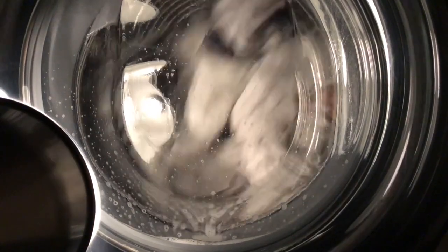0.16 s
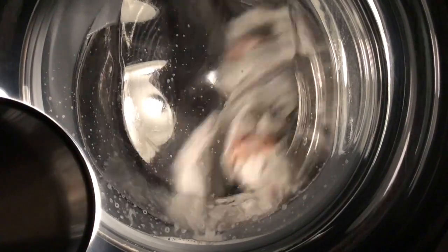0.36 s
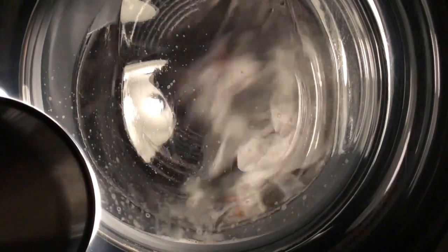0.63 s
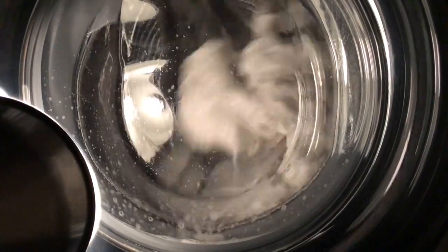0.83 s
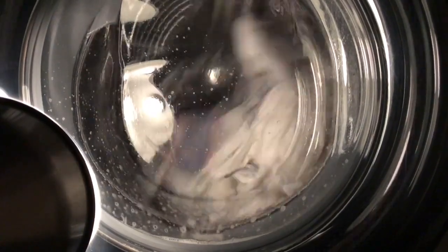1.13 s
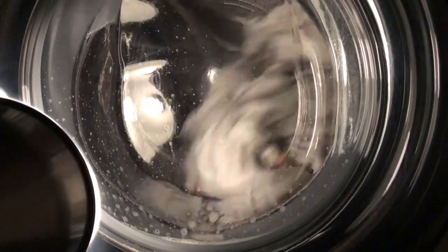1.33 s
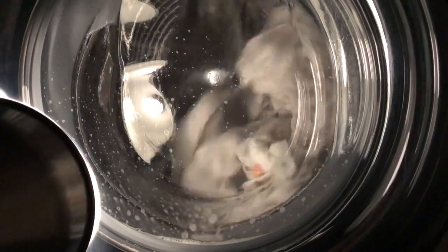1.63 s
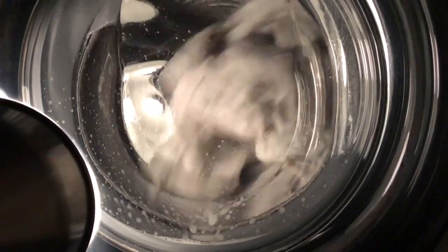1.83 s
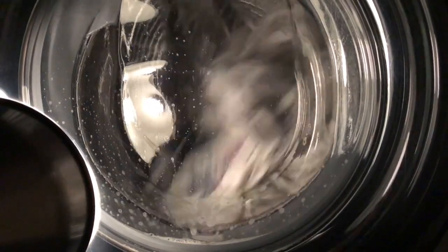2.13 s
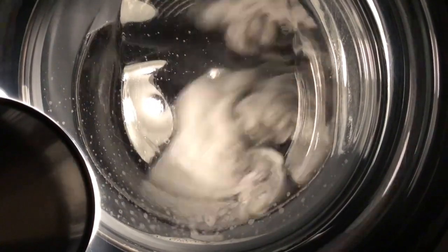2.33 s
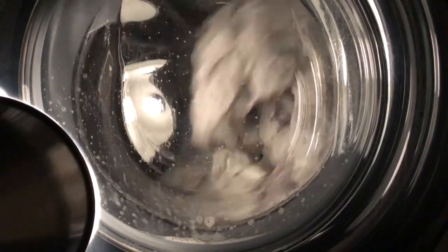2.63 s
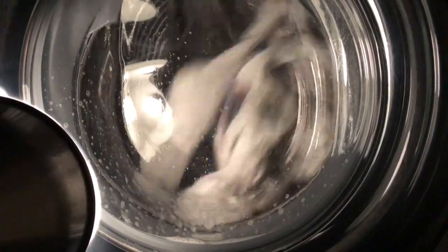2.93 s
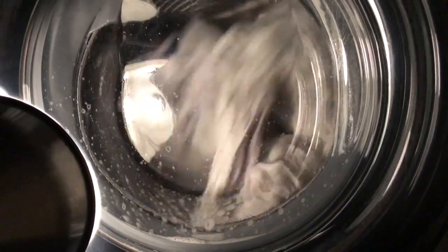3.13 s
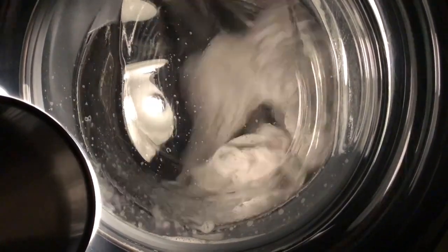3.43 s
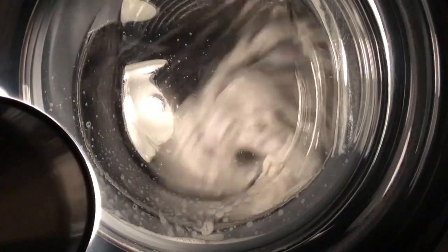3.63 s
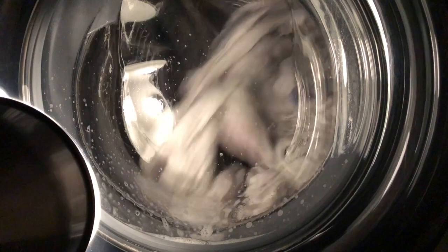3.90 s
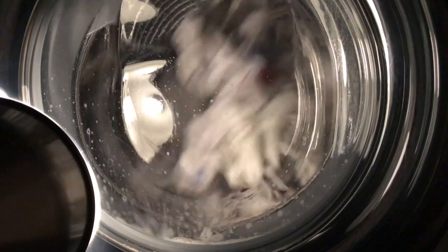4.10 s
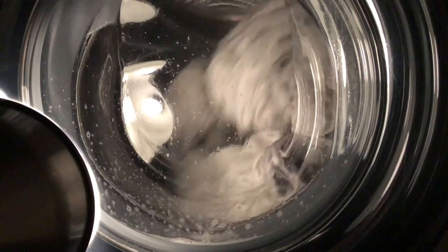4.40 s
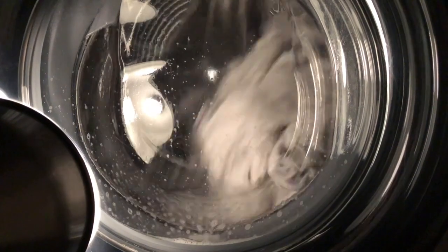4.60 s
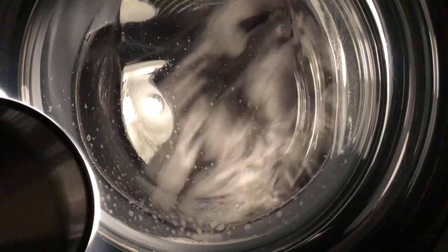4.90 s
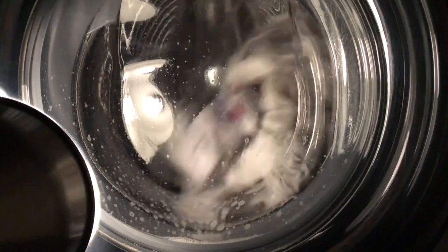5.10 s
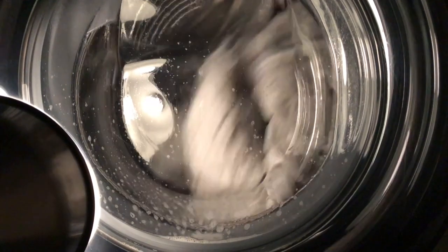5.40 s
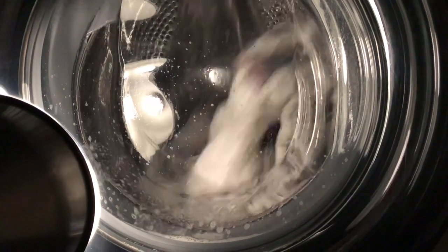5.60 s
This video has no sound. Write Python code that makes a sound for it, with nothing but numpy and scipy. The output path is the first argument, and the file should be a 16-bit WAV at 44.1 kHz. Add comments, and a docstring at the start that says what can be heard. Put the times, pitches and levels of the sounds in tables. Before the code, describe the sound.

A wet load tumbles in a front-loading washing machine at home, heard in mono very close to the door, with slight small-room echo. From the first moment, suds churn low and soft, with gurgles, tiny drips and light fizz. Soaked cloth falls irregularly, roughly ten impacts a second: short, damp slaps with dull drum knocks, deep tub thumps and splashes mostly muffled by the glass. A sharp, hollow slap stands out at 0.3 s; stirring dips near 0.75 s and swells near 1.2 s. A heavy slap lands at 1.94 s, then a strong cluster from 2.8 to 3.35 s, some with hollow, falling gulps of trapped air. From 3.5 to 5.4 s falls are generally softer and sloshier, with small flops between. Another firm slap comes at 5.53 s. Faint motor hum around a low pitch and very thin high whines run underneath until about 5.54 s, then quickly stop, leaving water and steady low room noise.

```python
"""Wet cloth slaps and thumps in a washing machine, heard close to the door in a small room.
Each fall is shaped noise for spray and splash, plus bubbles and decaying tones of the drum and tub.
Water sloshes, gurgles and drips: noise and short rising tones that follow the stirring.
The motor hums and its inverter whines until the drive switches off near the end.
A steady noise of machine and room lies underneath."""
import sys
import numpy as np
from scipy import signal
from scipy.fft import rfft, irfft, next_fast_len
from scipy.io import wavfile
from scipy.ndimage import map_coordinates

SR = 44100
rng = np.random.default_rng(int(sys.argv[2]) if len(sys.argv) > 2 else 0)


def transcribe(signal):
    """Save signal, clipped to [-1, 1], as a 16-bit WAV file at the path in sys.argv[1]."""
    frames = np.atleast_2d(signal).T
    limited = np.clip(frames, -1, 1)
    pcm = np.round(limited * 32767).astype(np.int16)
    wavfile.write(sys.argv[1], SR, pcm)


N = 253575  # length in samples

# Levels in the tables are starting points; the functions trim them further.
# Heavy falls of wet cloth. Each row: time in seconds, force in dB, tub thump in dB against the force,
# splash in dB against the force, basic fade time in seconds.
SLAPS = [(0.213, -36, -12, -23, 0.024), (0.282, -38, -13, -18.5, 0.016),
         (0.292, -29.5, -10.5, -22.5, 0.0086), (0.42, -37, -9, -19, 0.022),
         (0.439, -39.5, -5, -13.5, 0.012), (0.599, -37.5, -5, -22, 0.039), (0.639, -40.5, -8, -17.5, 0.027),
         (0.806, -39, -2.5, -23.5, 0.052), (0.865, -38.5, -3, -22, 0.022), (1.012, -35.5, -1.5, -16, 0.015),
         (1.175, -39, -6, -20, 0.0096), (1.253, -44.5, -6, -13, 0.017), (1.382, -40.5, -5, -19.0, 0.036),
         (1.494, -45.5, -3, -15, 0.019), (1.607, -44, -2.5, -16.5, 0.03), (1.709, -41, -12, -13.5, 0.0091),
         (1.937, -29, -5, -29, 0.027), (1.948, -39, -8, -12, 0.0089), (2.015, -41, -6, -22, 0.055),
         (2.078, -37.5, -3, -22.5, 0.028), (2.15, -40, -5, -20, 0.021), (2.303, -38.5, -6.5, -17.5, 0.025),
         (2.375, -51.5, -9, -11.5, 0.018), (2.458, -41, -11, -17.5, 0.026),
         (2.613, -38.5, -3.5, -22, 0.044), (2.703, -49.5, -3, -17, 0.016), (2.773, -37.5, -14, -33, 0.0051),
         (2.844, -32.5, -4, -23, 0.041), (2.898, -35.5, -7, -23.0, 0.037), (2.966, -32, -11, -22, 0.011),
         (3.008, -44.5, -2, -20, 0.048), (3.228, -30.5, -18, -23, 0.011), (3.276, -43.5, -6, -18, 0.026),
         (3.328, -33, -11, -24, 0.027), (3.404, -49, -8, -11, 0.014), (3.536, -45, -14, -16.5, 0.014),
         (3.637, -36, -9, -20.5, 0.023), (3.789, -39.5, -8.5, -17.5, 0.028), (3.88, -37, -3, -22, 0.014),
         (3.979, -38.5, -22, -22.5, 0.011), (4.066, -47.5, -7, -15, 0.016),
         (4.162, -36.5, -4.5, -21.5, 0.049), (4.218, -42.5, -6, -18, 0.018), (4.313, -48.5, -5, -15, 0.037),
         (4.383, -45.5, -13, -18, 0.017), (4.445, -41.5, -17, -21, 0.029), (4.525, -40.5, -9, -21, 0.055),
         (4.582, -40.5, -5, -19.0, 0.022), (4.647, -36.5, -3.5, -18.5, 0.051),
         (4.685, -43.5, -1, -21, 0.066), (4.83, -47.5, -8, -14, 0.037), (4.943, -45, 0.5, -18, 0.016),
         (5.058, -44.5, 1, -11, 0.023), (5.095, -37.5, -9, -18.5, 0.014),
         (5.252, -37.0, -13.5, -16.5, 0.012), (5.369, -41, -13, -21.0, 0.028),
         (5.526, -34, -6.5, -23.5, 0.026), (5.563, -43, -8, -14.5, 0.036)]
# Air trapped under a fold of cloth. Each row: start in seconds, level in dB, middle pitch in Hz.
GULPS = [(0.213, -41, 418), (0.296, -30.5, 493), (1.952, -40, 382), (2.974, -35.5, 535), (3.016, -45, 496),
         (3.231, -34.5, 389)]

# Tone colours, partly set by what the cabinet and the door glass let through.
# Each row: frequency in Hz, relative level in dB per Hz.
TUB = [(22, -65), (32, -30), (48, -17), (67, -7), (81, -12.5), (98, 1), (110, -1), (121, -2), (150, -3),
       (195, -7), (225, -12.5), (300, -43), (480, -100)]
DRUM = [(130, -46), (220, -10.5), (302, -2.5), (409, -7.5), (436, -12.5), (493, -11), (598, -16),
        (806, -16.5), (890, -37), (1160, -70), (1960, -120)]
SPLASH = [(520, -27.5), (890, 1), (1180, 4), (1380, -3), (1520, 0), (1650, -8.5), (2200, -9.5), (2470, -6),
          (2800, -15), (3640, -50.5), (6160, -120)]
SPRAY = [(1650, -38), (2800, -2), (3420, 0.5), (3690, -2.5), (4200, -2.5), (6290, -13), (8030, -15),
         (13000, -23)]

# Ringing tones of the tub under a heavy fall, and of the steel drum damped by water.
# Each row: basic pitch in Hz, relative level in dB, time to fade by 60 dB in seconds.
TUB_MODES = [(66.5, -13, 0.1), (97.6, 0.5, 0.12), (125.95, -11.5, 0.65), (147, 0.5, 0.12), (165.5, -2, 0.2),
             (200, -13.5, 0.13)]
DRUM_MODES = [(273, 5.5, 0.077), (297.2, 7.5, 0.27), (338, -13, 0.074), (379.7, -3, 0.18), (493.3, 3, 0.13),
              (573.4, -7.5, 0.18)]

# How hard the suds are stirred over time. Each row: time in seconds, change of level in dB.
STIR = [(0, 3), (0.62, 3.5), (0.75, -6), (0.88, -2.8), (1.2, 6.5), (1.32, -2), (1.45, 3), (1.85, 0.5),
        (2.1, 3.5), (2.56, 2.0), (2.95, 2), (3.12, -0.7), (3.4, 3.5), (3.59, -1), (3.8, 5.5), (4.8, -0.4),
        (5.56, 4.5), (5.7, -4.5)]
# Motor hum. Each row: multiple of the hum pitch, middle level in dB.
HUM = [(1, -67.5), (3, -58), (5, -75)]
# Thin tones of the drive. Each row: pitch in Hz, approximate width in Hz, level in dB.
WHINE = [(1201, 12, -77), (2552, 14, -86), (4775, 16, -95), (8191, 10, -104)]
# Steady noise of machine and room. Each row: frequency in Hz, relative level in dB per Hz.
FLOOR = [(20, -45), (50, -19.5), (80, -6), (125, 1), (220, -1.5), (320, 4), (440, -9), (700, -14.5),
         (1250, -20), (1700, -31), (5000, -38), (9000, -41), (13500, -45.5), (14500, -45.5)]
# Echo of the room. Each row: frequency in Hz, time to fade by 60 dB in seconds.
ROOM = [(100, 0.58), (1000, 0.44), (10000, 0.2)]

# Small flops of loose cloth: how many a second, force and its scatter in dB,
# then thump and splash in dB against the force, and basic fade time in seconds
FLOPS_PER_S, FLOP_DB, FLOP_SCATTER_DB = 5, -52, 0.8
FLOP_THUMP_DB, FLOP_SPLASH_DB, FLOP_FADE_S = -4, -21, 0.011
# A landing spreads over a short time in seconds, longer for a slow, sprawling fall
SPREAD_S, SPREAD_PER_FADE = 0.0049, 0.24
# The cloth meets the water before the drum: head starts in seconds
SPRAY_LEAD_S, SPLASH_LEAD_S = 0.0097, 0.0088
SPRAY_DB = -13  # against the splash value of each fall
# The wave that a fall sets off: delay, rise and settling in seconds
WAKE_LAG_S, WAKE_RISE_S, SETTLE_S = 0.0087, 0.015, 0.033
WAKE_RUMBLE_DB, WAKE_SLOSH_DB = -9, -21  # against the thump, against the force
# What the turning drum stirs up by itself: base levels in dB
STIR_RUMBLE_DB, STIR_SLOSH_DB, STIR_FIZZ_DB = -61, -61, -74.5
HUM_HZ = 100.5  # middle pitch of the hum
SWITCH_HZ, SIDEBAND_HZ = 15003, 32  # the inverter's switching tone and the distance to its sidebands
DRIVE_OFF = 5.54  # seconds
TOP_HZ = 15600  # upper limit of the whole sound


def laundry(load):
    """Each fall first throws spray and splash, then the soaked mass rings the tub and the drum."""
    s, force, thump_db, splash_db, fade = load.T
    spread = SPREAD_S + SPREAD_PER_FADE * fade
    # the folds of the cloth land one after another
    folds = amp(1.6 * wobble(120))

    thrown = swells(s - SPRAY_LEAD_S, force + splash_db + SPRAY_DB, spread, fades=0.89 * fade)
    spray = through(thrown * folds * patter(rate=6000, smooth=0.85), SPRAY)

    wet = swells(s - SPLASH_LEAD_S, force + splash_db - 0.4, spread, fades=0.96 * fade) * folds
    splash = through(wet * patter(rate=2500, smooth=0.84), SPLASH)
    squeezed_air = bubbles(centre_hz=900, spread=0.547, cycles=9.6, glide=0.062, size_db=2.5, count=2000)
    squelch = amp(-6.0) * wet * squeezed_air

    pressing = swells(s, force - 11, spread, fades=0.78 * fade)
    push = through(pressing * patter(rate=1300, smooth=0.9), DRUM)
    heaving = swells(s, force + thump_db - 8.0, spread, fades=0.68 * fade)
    heave = through(heaving * patter(rate=270, smooth=0.71), TUB)

    drum = knocks(DRUM_MODES, s + 0.00497, force - 17.5, attack=0.0023, scatter=0.9)
    tub = knocks(TUB_MODES, s + 0.0023, force + thump_db + 0.3, attack=0.012, scatter=0.19)
    return spray + splash + squelch + push + heave + drum + tub


def falls():
    """The heavy falls, and small flops scattered in time among them, as rows like SLAPS."""
    count = int(FLOPS_PER_S * N / SR)
    when, strength, wetness = rng.standard_normal((count, 3)).T
    # one flop in each equal slice of time, shifted at random within it
    times = (np.arange(count) + 0.5 + np.tanh(when) / 2) * DRIVE_OFF / count
    flops = []
    for s, a, b in zip(times, strength, wetness):
        force = FLOP_DB + FLOP_SCATTER_DB * a
        splash = FLOP_SPLASH_DB + FLOP_SCATTER_DB * b
        flops.append((s, force, FLOP_THUMP_DB, splash, FLOP_FADE_S))
    return np.array(SLAPS + flops)


def swells(times, levels_db, rises, fades):
    """Strength over time of many contacts, each a quick rise and a fade; their powers add."""
    power, t = np.zeros(N), np.arange(SR // 4) / SR
    for s, db, rise, fade in np.broadcast(times, levels_db, rises, fades):
        shape = (1 - np.exp(-(t / rise) ** 2)) * np.exp(-t / (abs(fade) + 0.00056))
        add(power, s, (amp(db) * shape / shape.max()) ** 2)
    return np.sqrt(power)


def knocks(modes, times, levels_db, attack, scatter):
    """Each fall rings all the modes, with new strengths, pitches and phases for each place of contact."""
    track, t = np.zeros(N), np.arange(SR // 3) / SR
    hz, mode_db, t60 = np.transpose(modes)[:, :, None]
    decays = amp(mode_db - 60 * t / t60) * (1 - np.exp(-t / attack))
    for s, db in zip(times, levels_db):
        strength, detune, phase = rng.standard_normal((3, len(modes), 1))
        tones = np.sin(2 * np.pi * hz * (1 + 0.0083 * detune) * t + scatter * phase)
        rings = amp(db + 2 * strength) * decays * tones
        add(track, s, rings.sum(0))
    return track


def gulps():
    """Trapped air rings hollow and drops in pitch as the cloth opens."""
    track, t = np.zeros(N), np.arange(SR // 8) / SR
    fading = amp(-60 * t / 0.094) * (1 - np.exp(-t / 0.0012))
    for s, db, hz in GULPS:
        pitch = hz * (0.906 + 0.21 * np.exp(-t / 0.0098))
        ring = np.sin(2 * np.pi * np.cumsum(pitch) / SR) * fading
        add(track, s, amp(db - 2.5) * ring)
    return track


def water(load):
    """Stirred suds rumble, slosh and fizz; waves after the falls lift all but the fizz and drips."""
    s, force, thump_db, _, _ = load.T
    stir_db = np.interp(clock(), *np.transpose(STIR)) + 0.8 * wobble(16)
    rumble_db = stirred(STIR_RUMBLE_DB + stir_db, s, force + thump_db + WAKE_RUMBLE_DB)
    slosh_db = stirred(STIR_SLOSH_DB + stir_db, s, force + WAKE_SLOSH_DB)
    fizz_db = STIR_FIZZ_DB + stir_db
    lap_db = 1.8 * wobble(50)  # quick random lapping

    rumble = through(amp(rumble_db - 1.0) * rng.standard_normal(N), TUB)
    churn = through(amp(slosh_db + 0.6 * lap_db) * patter(rate=900, smooth=0.68), DRUM)
    slosh = through(amp(slosh_db - 12.0 + lap_db) * patter(rate=800, smooth=1.0), SPLASH)
    fizz = through(amp(fizz_db - 8.5 + lap_db) * patter(rate=1500, smooth=0.99), SPRAY)

    large = bubbles(centre_hz=689, spread=0.33, cycles=7.5, glide=0.041, size_db=-0.5, count=500)
    gurgles = amp(slosh_db - 10.5) * large
    small = bubbles(centre_hz=2162, spread=0.28, cycles=31, glide=0.046, size_db=0.7, count=800)
    drips = amp(fizz_db - 6.5 + lap_db) * small
    return rumble + churn + slosh + fizz + gurgles + drips


def stirred(stir_db, times, wake_db):
    """Level of moving water in dB: the drum's stirring plus the wave after each fall."""
    wake = swells(times + WAKE_LAG_S, wake_db, WAKE_RISE_S, SETTLE_S)
    return 20 * np.log10(np.hypot(wake, amp(stir_db)))


def patter(rate, smooth):
    """Tiny water impacts, about rate a second, over a smooth rush of noise; rms 1."""
    impacts = rng.standard_normal(N) * (rng.random(N) < rate / SR)
    return unit(unit(impacts) + smooth * rng.standard_normal(N))


def bubbles(centre_hz, spread, cycles, glide, size_db, count, size=800):
    """Bubbles at random moments, each a short ring that rises in pitch; rms 1."""
    start = rng.integers(0, N, (count, 1))
    hz = centre_hz * np.exp(spread * rng.standard_normal((count, 1)))
    hz = np.clip(hz, 100, SR / 4)
    turns = hz * np.arange(size) / SR
    age = turns / cycles
    loudness = np.minimum(rng.exponential(size=(count, 1)), 3)
    rings = amp(size_db * loudness - 26.5 * age) * (1 - np.exp(-turns))
    rings = rings * np.sin(2 * np.pi * turns * (1 + glide * age))
    places = start + np.arange(size)
    return unit(np.bincount(places.ravel(), rings.ravel(), N)[:N])


def motor():
    """The hum wavers at random in level and pitch; hum and whine end when the drive cuts out."""
    waver_db, waver_rate, drift = 2, 7, 0.005  # dB, random points a second, share of the pitch
    turns = np.cumsum(HUM_HZ * (1 + drift * wobble(waver_rate))) / SR
    hum = np.zeros(N)
    for k, db in HUM:
        hum += amp(db + waver_db * wobble(waver_rate)) * np.sin(2 * np.pi * round(k) * turns)
    return hum * running(coast=0.094) + inverter() * running(coast=0.013)


def inverter():
    """Thin whines, and a switching tone that the motor current splits into sidebands on a rough skirt."""
    tones = sum(amp(db) * narrow(hz, width) for hz, width, db in WHINE)
    upper = amp(-84.0) * narrow(SWITCH_HZ + SIDEBAND_HZ, width=4.0)
    lower = amp(-81.5) * narrow(SWITCH_HZ - SIDEBAND_HZ, width=35)
    skirt = amp(-89) * narrow(SWITCH_HZ, width=75)
    return tones + upper + lower + skirt


def running(coast):
    """1 while the drive is on, then a straight fall to 0 over coast seconds."""
    return np.clip(1 - (clock() - DRIVE_OFF) / coast, 0, 1)


def narrow(hz, width):
    """A fuzzy tone of rms about 1: two waves a quarter turn apart, each wavering at random."""
    phase = 2 * np.pi * hz * clock()
    return wobble(2 * width) * np.sin(phase) + wobble(2 * width) * np.cos(phase)


def room(x):
    """The walls answer with a short tail of fading noise, shortest in the treble."""
    hz, t, z = signal.stft(rng.standard_normal(SR // 2), SR, nperseg=256)
    fading = amp(-60 * t / along(ROOM, hz)[:, None])
    tail = signal.istft(z * fading, SR, nperseg=256)[1]
    delayed = np.pad(tail, (SR // 200, 0))  # 5 ms late
    return signal.fftconvolve(x, delayed / np.linalg.norm(tail))[:N]


def steady_floor():
    """Steady noise of machine and room: white noise given the FLOOR colour."""
    return amp(-57.0) * through(rng.standard_normal(N), FLOOR)


def amp(db):
    """Decibels to gain."""
    return 10 ** (np.asarray(db) / 20)


def unit(x):
    """Scaled to rms 1."""
    return x / np.sqrt(np.mean(x ** 2) + 1e-20)


def along(points, hz):
    """Values between the (Hz, value) points, read on a log frequency axis."""
    f, v = np.transpose(points)
    return np.interp(np.log(hz + 1), np.log(f + 1), v)


def clock():
    """The time of every sample in seconds."""
    return np.arange(N) / SR


def wobble(rate):
    """A smooth random curve through rate random points a second; rms 1."""
    coarse = clock()[::16]
    knots = rng.standard_normal(int(N * rate / SR) + 4)
    curve = map_coordinates(knots, [coarse * rate])
    return unit(np.interp(clock(), coarse, curve))


def add(track, s, sound):
    """Mixes a sound into a track from time s on."""
    part = track[max(0, round(s * SR)):][:len(sound)]
    part += sound[:len(part)]


def through(x, spectrum, size=8192):
    """Colours x with this spectrum without sounding early; white noise keeps its level."""
    gain = np.maximum(amp(along(spectrum, np.fft.rfftfreq(size, 1 / SR))), 1e-6)
    # folding the cepstrum puts the response as early as possible (minimum phase)
    cepstrum = irfft(np.log(gain))[:size // 2]
    cepstrum[1:] *= 2
    answer = irfft(np.exp(rfft(cepstrum, size)))
    return signal.fftconvolve(x, answer / np.linalg.norm(answer))[:N]


def scene():
    """Load and water with the room's answer, over the motor and a steady floor."""
    load = falls()
    wash = laundry(load) + gulps() + water(load)
    return (wash + amp(-13) * room(wash) + motor() + steady_floor())[None]


def record(dry):
    """Keeps only the frequencies below TOP_HZ."""
    size = next_fast_len(N + SR // 2)
    kept = np.fft.rfftfreq(size, 1 / SR) < TOP_HZ
    return irfft(rfft(dry, size) * kept, size)[:, :N]


dry = scene()
out = record(dry)
transcribe(out)
```